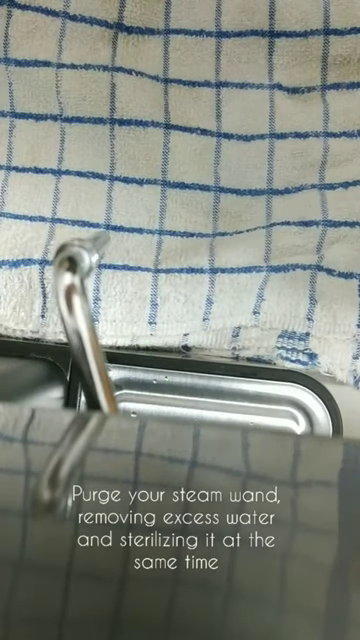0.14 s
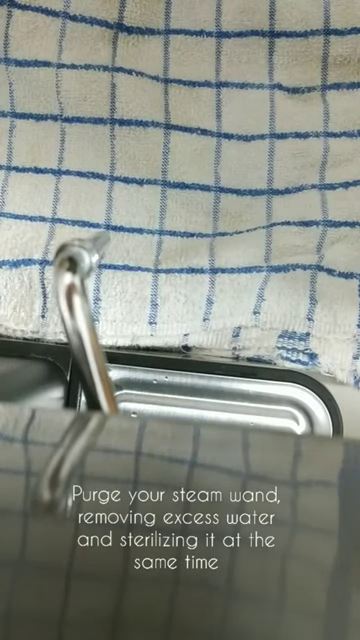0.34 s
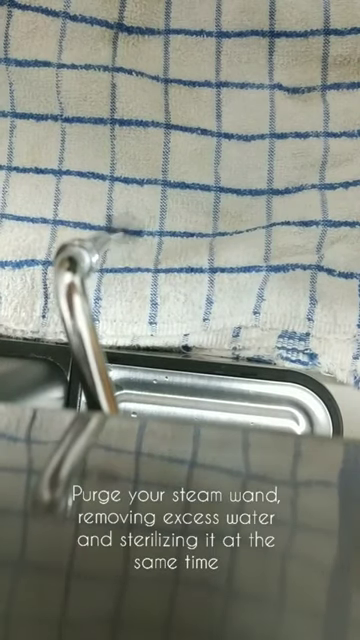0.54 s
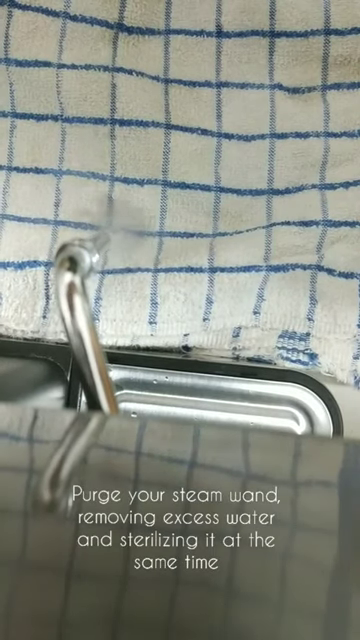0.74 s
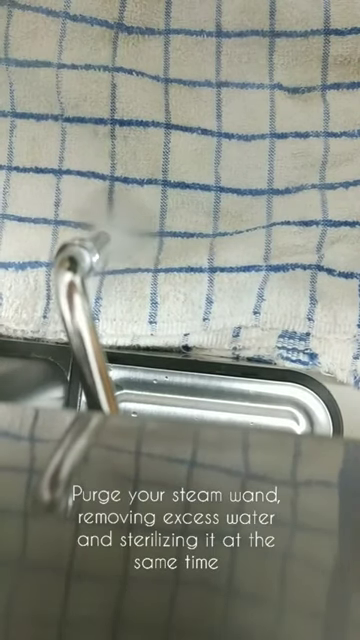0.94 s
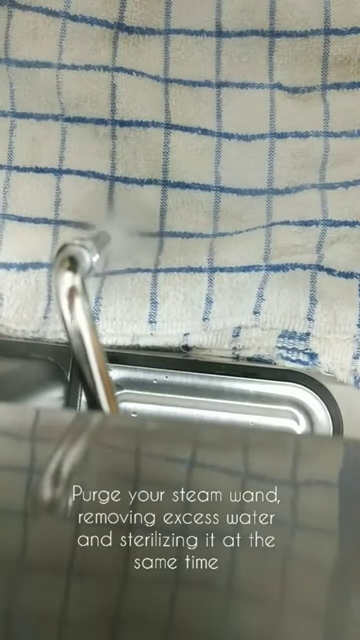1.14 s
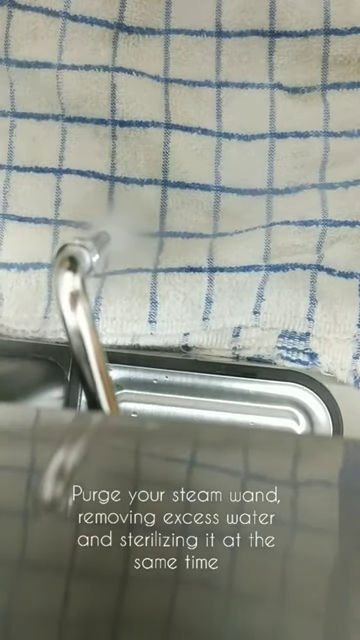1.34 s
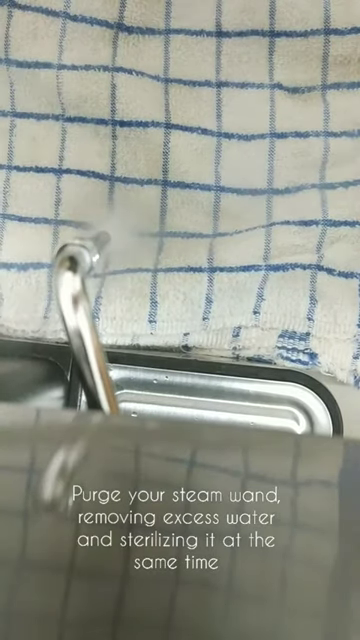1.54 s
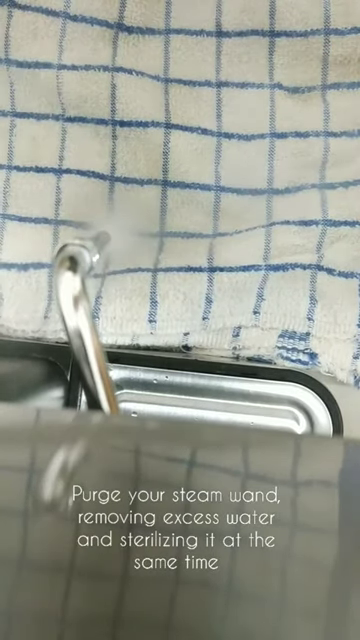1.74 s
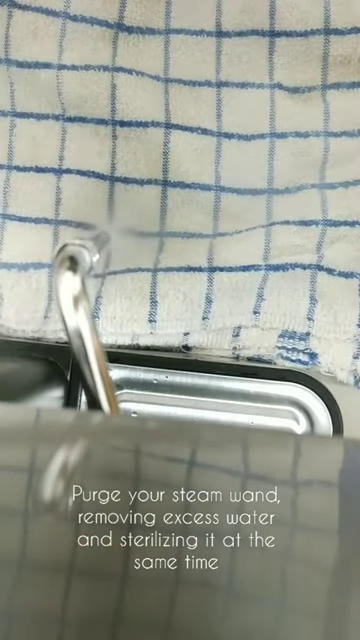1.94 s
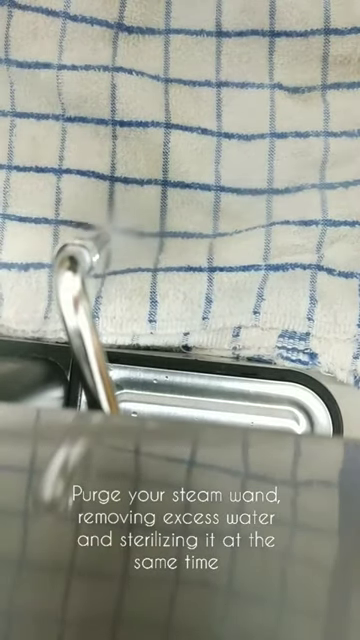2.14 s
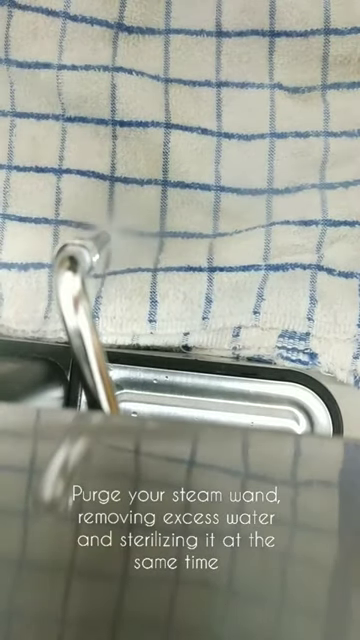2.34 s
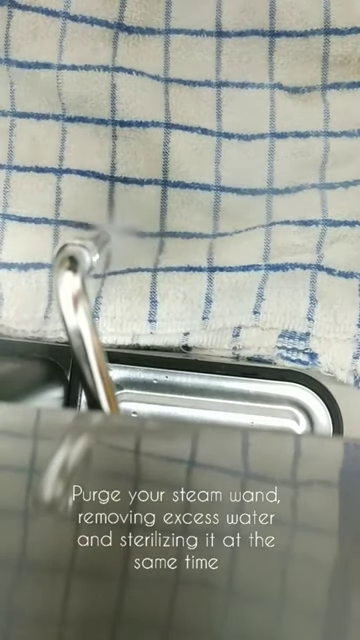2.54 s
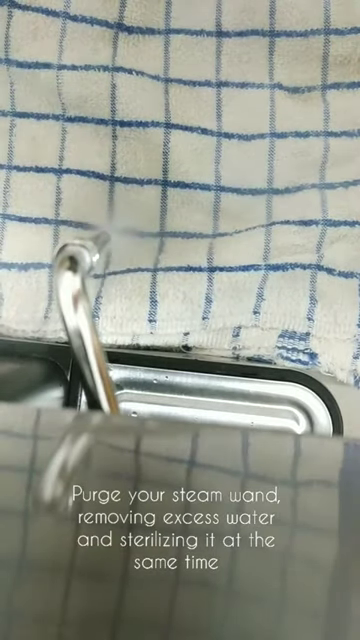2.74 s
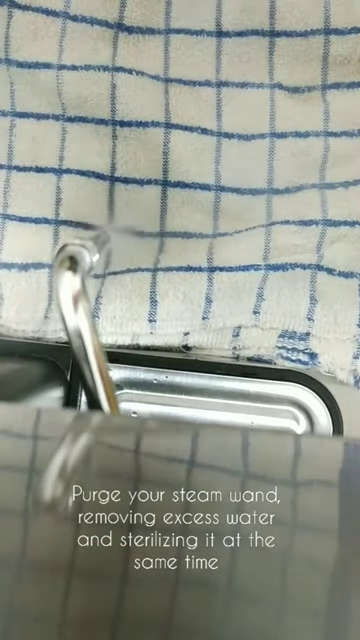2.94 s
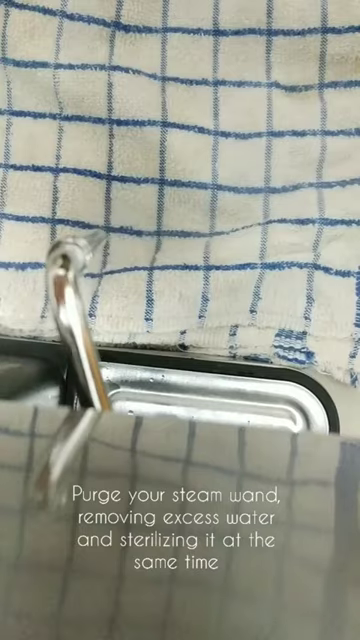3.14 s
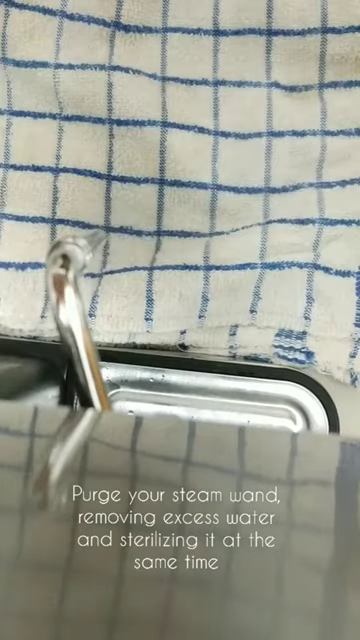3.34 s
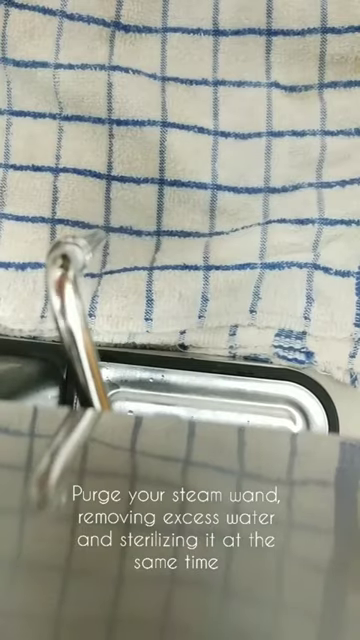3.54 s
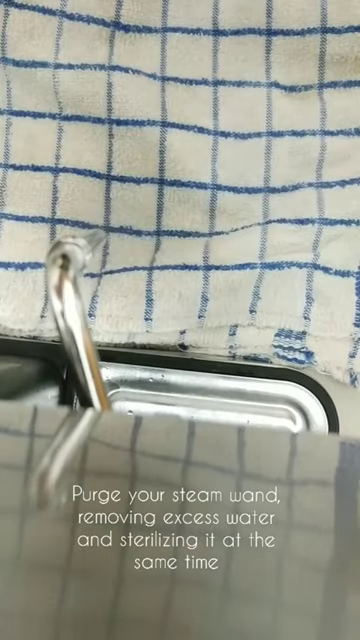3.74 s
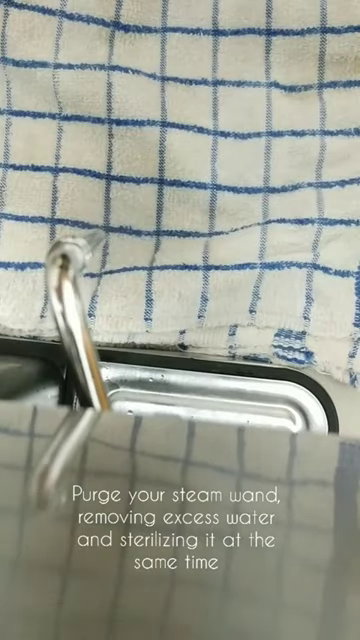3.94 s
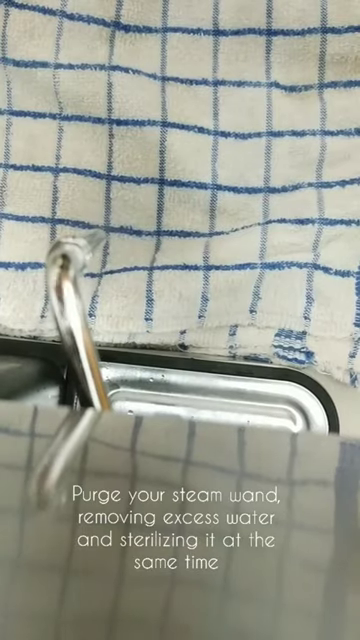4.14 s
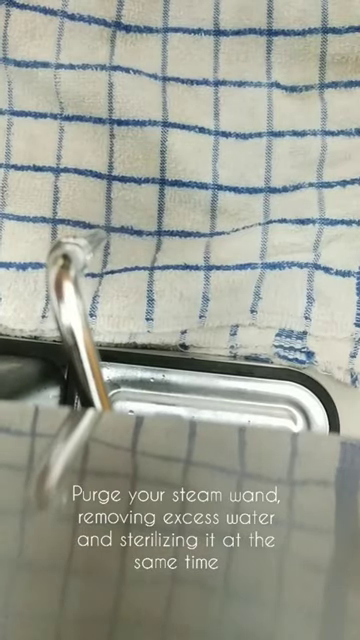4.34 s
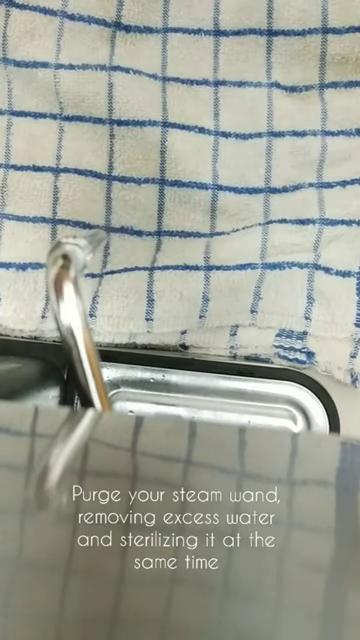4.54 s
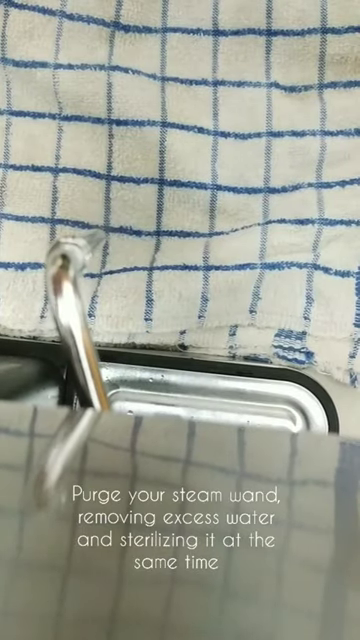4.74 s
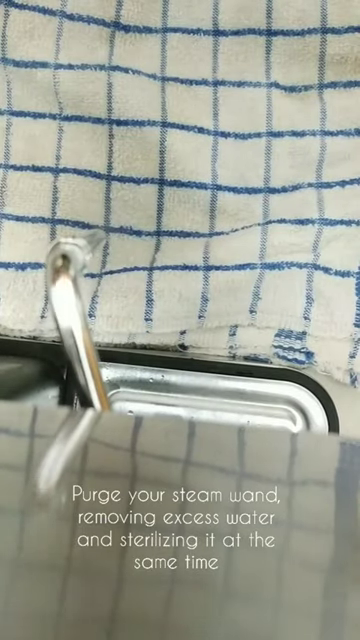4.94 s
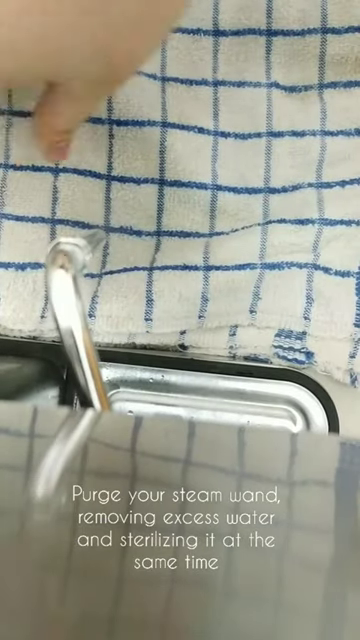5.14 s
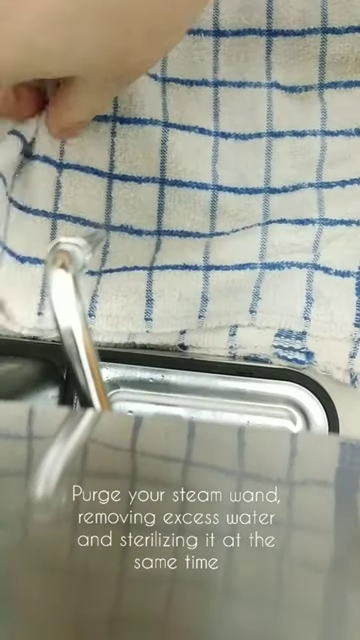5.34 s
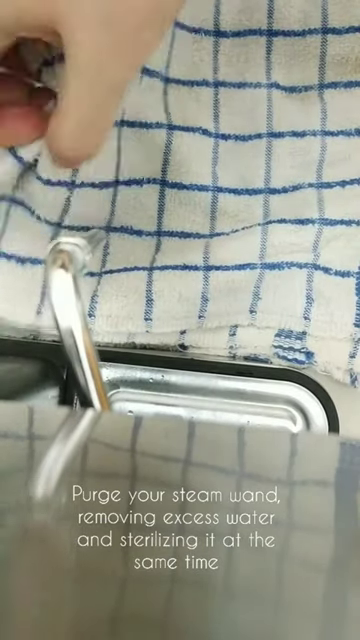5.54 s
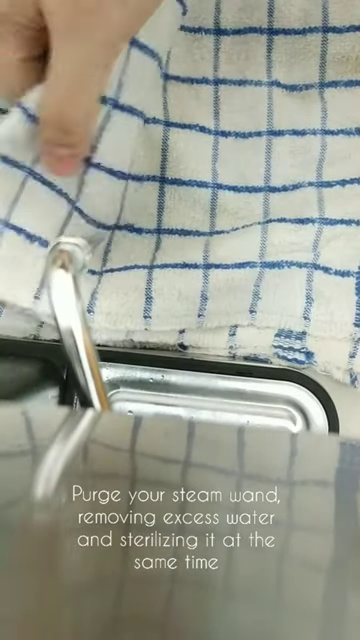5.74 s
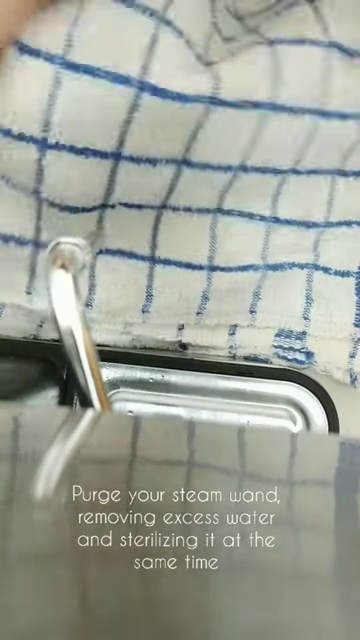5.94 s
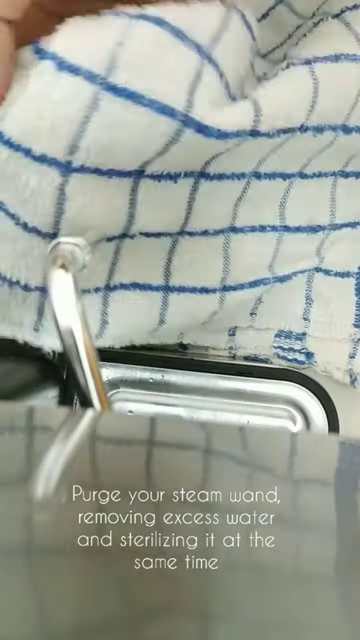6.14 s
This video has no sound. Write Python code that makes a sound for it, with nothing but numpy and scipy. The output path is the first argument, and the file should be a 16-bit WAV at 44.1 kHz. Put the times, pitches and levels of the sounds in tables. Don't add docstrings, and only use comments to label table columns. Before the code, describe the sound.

A steam wand pops and spits water slugs, bursts into a loud dry hiss, shuts off, then knocks and cloth rustles in a quiet kitchen.

```python
import sys
import numpy as np
from scipy import signal
from scipy.fft import rfft, irfft, next_fast_len
from scipy.io import wavfile
from scipy.ndimage import uniform_filter1d

SR = 44100
rng = np.random.default_rng(int(sys.argv[2]) if len(sys.argv) > 2 else 0)


def to_linear_factor(level_db):
    exponent = np.asarray(level_db, float) / 20
    return 10 ** exponent


def unload_wav(signal):
    wavfile.write(
        sys.argv[1],
        SR,
        np.round(np.clip(np.atleast_2d(signal).T, -1, 1) * 32767).astype(np.int16),
    )


N = 272966
T = np.arange(N) / SR
SIDES = np.array([[.5], [-.5]])

# frequency [Hz], density [dB per Hz].
ROOM_COLOUR = [(30, -20), (70, -22), (110, -9.5), (214, -3), (459, -13), (496, -8), (955, -12),
               (1270, -12.5), (1490, -15.5), (2870, -16.5), (4300, -19.5), (6300, -26.5), (11000, -27.5),
               (15800, -33)]
# frequency [Hz], correlation [-1 to 1].
ROOM_ALIKE = [(60, .95), (130, 0.81), (290, 0.42), (640, 0.26), (900, 0), (1410, 0), (3100, 0),
              (6820, 0.06), (15000, .4)]
ROOM_BANDS_DB = [-52.5, -54.5, -60.5]
# start [s], length [s], middle over room [dB], rustle over room [dB].
HANDLING = [
    (4.07, 0.25, 5, 4),
    (4.486, 0.33, 2.5, -1),
    (4.838, 0.29, 3.5, 1.7),
    (5.257, .05, -1, 4),
    (5.55, .05, -1.5, 5.5),
    (5.694, 0.049, 0, 0.5),
    (5.94, .03, -2, 3.5),
]
# start [s], length [s], level [dB], centre [Hz], width [Hz].
SIZZLES = [
    (0.013, .006, -56, 8200, 2200),
    (4.06, 0.233, -56.5, 4700, 4300),
    (4.35, .15, -60, 3600, 2500),
    (4.13, 0.033, -60, 11000, 6000),
    (4.4, .01, -55.5, 2200, 1000),
    (4.2, 0.25, -57, 780, 140),
    (5.03, 0.14, -60, 840, 400),
    (5.55, 0.13, -62, 1050, 350),
    (3.56, 0.16, -56.5, 2650, 600),
]
# frequency [Hz], density [dB per Hz].
JET_COLOUR = [(41, -54), (70, -55), (118, -14), (222, -13), (439, -11.5), (481, -13.5), (908, -15.5),
              (1060, -15.5), (1530, -18.5), (2950, -18.5), (5960, -13.5), (12000, -7.5), (14800, -3),
              (15800, -3.5)]
# frequency [Hz], correlation [-1 to 1].
JET_ALIKE = [(60, .3), (130, .45), (350, .33), (700, .0), (1410, .26), (3100, .18), (6000, .04), (10500, 0),
             (12000, 0.7), (15000, 0.74)]
# frequency [Hz], left minus right [dB].
JET_PAN = [(60, -4), (110, 7.5), (200, 7.5), (380, 0), (700, 2), (1290, 7.5), (2380, -4.5), (4400, -1),
           (8120, -2), (15000, -1)]
# time [s], steam flow as hiss level [dB], left minus right [dB].
FLOW = [(.05, -68, -2), (.2, -64, -14), (.215, -51, -25), (.45, -37, -8.5), (.853, -35, -8), (.862, -22, 3),
        (.99, -19.5, 2.5), (1.2, -17, -0.5), (1.8, -16, -3.5), (2.4, -18, -3.5), (3.066, -15.5, -2.5),
        (3.072, -21.5, 4.5), (3.17, -27, 5), (3.22, -28.5, -0.5), (3.37, -35.5, -11.5), (3.63, -45.5, -18),
        (3.9, -50.5, -17), (4.0, -60.5, -17)]
# clearing time [s], choke length [s], choke [dB], surge [dB].
CHOKES = [(.34, 0.094, -9, -5), (.43, 0.028, 7, 3), (.742, .03, 5, -5), (.8, 0.06, -4, -1),
          (.55, 0.063, -2, -1), (1.175, 0.045, -1.5, 0), (1.817, 0.1, -4, 0.5), (1.875, 0.032, 0, 0),
          (1.972, 0.034, -2, 0.5), (2.06, 0.04, 0.5, 1.5), (2.088, 0.027, -3, 0), (2.208, 0.12, -3, 1.5),
          (2.15, 0.042, -1.5, -1), (1.72, 0.041, -1, 0.5), (2.265, .04, 0.5, 0.5), (2.455, .04, 1.5, 0),
          (2.592, 0.18, -3, 1), (2.645, 0.03, 0, 3), (1.44, 0.037, 1.5, -1), (2.776, 0.027, -1, 1.5),
          (2.88, 0.15, -3, -1), (2.98, 0.12, -4, 0), (3.031, 0.022, -4, 1.5)]
# centre [Hz], width [Hz], level over the hiss [dB].
LEAK = [(6530, 420, -5), (2770, 410, -16.5)]
# time [s], pop [dB], pipe ring [dB], thump [dB].
POPS = [(0.1031, -7.5, -17.5, -30.5), (0.185, -37, -28, -45), (0.195, -20.5, -24, -36), (.2, -26, -35, -34),
        (.211, -29, -25, -34), (0.2284, -6, -24, -18.5), (.234, -31, -32, -28), (0.258, -27, -37, -29),
        (.28, -39, -40, -41), (.303, -50, -23, -45), (.309, -51, -19, -47), (.317, -48, -16, -42),
        (.323, -42, -20, -42), (0.3416, -12.5, -16, -33), (0.345, -10.5, -22, -20), (0.35, -27, -17, -21),
        (.361, -21, -20, -22), (.377, -28, -35, -43), (0.384, -6, -29, -17), (0.401, -6.5, -14, -22),
        (0.415, -11, -13, -20), (0.4173, -7, -24, -36), (0.5028, -25, -22, -49), (0.5247, -37, -25, -30),
        (0.5526, -16, -18, -23), (0.5571, -6, -18, -16.5), (0.568, -13, -34, -30), (0.5767, -7, -27, -32),
        (0.5873, -6, -35, -25), (0.5924, -5.5, -19, -41), (0.6036, -10, -36, -33),
        (0.6905, -14.5, -10.5, -43), (.695, -27, -16, -45), (.701, -30.5, -27, -45),
        (0.7363, -12, -22, -45), (0.7418, -7, -23, -25), (0.7507, -20, -37, -36), (0.7582, -8.5, -50, -22),
        (0.7755, -5.5, -39, -24), (0.7902, -5, -17, -28), (0.7965, -25, -34, -26), (0.8097, -6, -25, -40),
        (0.821, -24, -35, -42), (.845, -31, -43, -44), (0.94, -28, -38, -22.5), (0.976, -31, -37, -29),
        (1.007, -36, -21, -29)]
# start [s], length [s], level at the tip [dB], pipe minus tip [dB].
CHURNS = [(0.109, .008, -43, 7), (0.127, 0.038, -46.5, -4), (0.187, 0.012, -32, 4.5),
          (0.214, 0.008, -36, 3), (0.229, 0.0067, -30, 2), (0.255, 0.1, -42, 2.5), (0.325, 0.006, -57, 16),
          (0.354, 0.014, -30, -12), (0.375, .006, -33, -8), (0.399, 0.024, -23.5, -20),
          (0.443, 0.029, -37, -2), (0.483, 0.077, -40, 8.5), (0.565, 0.04, -29, -5),
          (0.617, 0.063, -31, -4), (0.693, 0.008, -30.5, 4), (0.722, 0.026, -30, 3.5),
          (0.753, .004, -34, -8), (0.796, 0.006, -26.5, -12), (0.817, 0.044, -30, -8),
          (0.88, 0.031, -36, -3), (0.929, 0.057, -37, -6), (0.997, 0.024, -42, -2), (1.098, 0.075, -45, 5)]
# start [s], length [s], level [dB], centre [Hz], width [Hz].
SPITS = [(.184, 0.0015, -43, 9200, 10000), (.194, 0.0034, -45, 7000, 8000), (.21, 0.02, -38, 10900, 9000),
         (.262, .01, -36, 11400, 4000), (0.442, 0.028, -35, 9900, 3000), (0.485, 0.025, -28, 13500, 3500),
         (.63, .03, -36, 13000, 5000), (0.696, .02, -35, 13500, 5000), (.725, .012, -35, 9050, 6000),
         (.739, 0.0038, -20.5, 10600, 3000), (0.81, 0.039, -35, 14800, 2000),
         (.845, 0.009, -29, 13900, 3000), (.858, 0.006, -23, 8800, 5000), (.868, .025, -26, 10500, 3000)]
# time [s], level [dB], frequency [Hz].
TICKS = [(2.775, -23, 1730), (3.299, -21.5, 2760), (3.33, -21.5, 510), (3.707, -29, 550), (4.159, -32, 875),
         (4.387, -31.5, 780), (4.459, -34.5, 2460), (5.009, -46, 604), (5.099, -45, 719), (5.569, -33, 689),
         (5.949, -39.5, 400)]
# start [s], length [s], level [dB].
HUMS = [
    (3.17, 0.069, -50),
    (3.32, 0.37, -50),
    (3.94, 0.027, -45),
    (4.136, 0.053, -49),
    (4.354, 0.1, -49.5),
]
# time [s], body [dB], crack [dB], left minus right [dB].
KNOCKS = [(4.7503, -24, -38, -3), (4.754, -21, -62, 0), (4.7628, -24, -22.5, -9.5), (4.784, -29, -33, -0.5),
          (4.788, -35, -29, -3), (4.8042, -25, -52, -10), (4.8073, -9.5, -18, -8), (4.813, -19.5, -35, -8),
          (4.818, -21, -38, -4), (4.828, -23, -49, 7), (4.851, -31, -39, 1)]
# frequency [Hz], level [dB], t60 [s].
COUNTER_MODES = [(237, -7, 0.12), (322, -2, 0.046), (547, 4, 0.05), (680, -1.5, 0.044), (925, 1.5, 0.037),
                 (1080, 0, 0.037), (1464, -3, 0.033), (1320, -5, .03), (2405, -1, 0.014),
                 (2920, 1.5, 0.021), (4230, -9, 0.012), (6280, -10, .016), (7200, -12, 0.015)]
# time [s], turning rate [Hz], level [dB].
FAN = [
    (0, 94, -75),
    (4.55, 94.5, -73),
    (5.3, 99, -55.5),
    (5.86, 102, -51),
    (6.19, 104.5, -52.5),
]
# multiple of the turning rate, level [dB].
FAN_ORDERS = [(1, -2.5), (1.5, -4), (2, -8)]


def curves(table):
    s, *columns = np.transpose(table)
    return [np.interp(T, s, c) for c in columns]


def at(points, hz):
    f, v = np.transpose(points)
    return np.interp(np.log(hz), np.log(f), v)


def to_db(gain):
    return 20 * np.log10(gain + 1e-6)


def level(x):
    return x / x.std()


def smooth(x, size):
    return uniform_filter1d(uniform_filter1d(x, size), size)


def walk(rate):
    hold = int(SR / rate)
    steps = np.repeat(rng.standard_normal(N // hold + 1), hold)
    return 1.08 * smooth(steps, hold)[:N]


def bout(s, length_s, rise_s, fall_s):
    return np.exp(np.minimum(T - s, 0) / rise_s - np.maximum(T - s - length_s, 0) / fall_s)


def resonance(x, hz, width_hz):
    return signal.lfilter(*signal.iirpeak(hz, hz / width_hz, fs=SR), x)


def grain(hz, rise_s, fall_s, phase):
    t = np.arange(2048) / SR
    shape = (1 - np.exp(-t / rise_s)) ** 2 * np.exp(-t / fall_s)
    return np.sin(2 * np.pi * hz * t + phase) * shape / shape.max()


def add(out, s, sound):
    i = int(s * SR)
    out[:, i:i + sound.shape[1]] += sound


def bands(source, colour, alike, lag_from_hz):
    lag_s, lag_top_hz = .00052, 9500
    size = next_fast_len(N)
    f = np.maximum(np.arange(size // 2 + 1) * SR / size, 1)
    ripple_db = 1.5 * level(smooth(rng.standard_normal(len(f)), 900))
    gain = to_linear_factor(at(colour, f) + ripple_db * np.clip(f / 6000, 0, 1)) * (f < colour[-1][0])
    mid, side = rfft(source, size) * gain
    c = np.clip(at(alike, f), -.95, .95)
    pair = np.array([1, -1])[:, None] * side * np.sqrt((1 - c) / 2) + mid * np.sqrt((1 + c) / 2)
    pair[0] *= np.exp(-2j * np.pi * f * lag_s * (f > lag_from_hz) * (f < lag_top_hz))
    for hz in 32 * 2 ** np.arange(0, 9.6, .5):
        mask = np.cos(np.pi * np.clip(np.log2(f / hz), -.5, .5)) ** 2
        part = irfft(pair * mask, size)[:, :N]
        yield hz, part, np.mean(part ** 2)


def shaped(slices, anchors_hz, edges_hz, levels_db, flicker_db, rate):
    slices = list(slices)
    base_db = [10 * np.log10(sum(p for hz, _, p in slices if lo <= hz < hi)) for lo, hi in edges_hz]
    out, last = 0, walk(rate)
    for hz, part, _ in slices:
        weights = [np.interp(np.log(hz), np.log(anchors_hz), w) for w in np.eye(len(base_db))]
        own = walk(rate)
        db = sum(w * (lv - b) for w, lv, b in zip(weights, levels_db, base_db))
        out = out + part * to_linear_factor(db + flicker_db * (own + last))
        last = own
    return out


def handling():
    middle, top = sum(np.outer([middle_db, top_db], bout(s, length_s, rise_s=0.086, fall_s=0.056))
                      for s, length_s, middle_db, top_db in HANDLING)
    low_db, middle_db, top_db = ROOM_BANDS_DB
    return [low_db + 0.67 * middle, middle_db + middle, top_db + top]


def room():
    slices = bands(rng.standard_normal((2, N)), ROOM_COLOUR, ROOM_ALIKE, lag_from_hz=900)
    early_db = np.interp(T, [0, .2, 3.5], [1.5, 1.2, 0])
    edges_hz = [(100, 450), (450, 2000), (4000, 17000)]
    return to_linear_factor(1.0 + early_db) * shaped(slices, [220, 950, 7000], edges_hz, handling(), flicker_db=0.9, rate=13)


def hisses(table, rise_s, fall_s, pan_db):
    out, lumps = np.zeros((2, N)), to_linear_factor(3.5 * walk(300))
    for s, length_s, db, hz, width_hz in table:
        span = slice(max(int((s - .1) * SR), 0), int((s + .4) * SR))
        noise = rng.standard_normal((2, N // 12))
        hiss = level(resonance(resonance(noise, hz, width_hz), hz, width_hz))
        shape = (lumps * bout(s, length_s, rise_s, fall_s))[span]
        out[:, span] += hiss[:, :len(shape)] * shape * to_linear_factor(db + pan_db * SIDES)
    return out


def chokes():
    clear_s, surge_s = 0.024, 0.034
    return sum(np.interp(T, [s - length_s, s - clear_s, s, s + surge_s], [0, choke_db, surge_db, 0])
               for s, length_s, choke_db, surge_db in CHOKES)


def churn():
    tip, pipe = 0, 0
    for s, length_s, db, pipe_db in CHURNS:
        gain = bout(s, length_s, rise_s=.003, fall_s=.009) * to_linear_factor(db)
        tip = tip + gain
        pipe = pipe + gain * to_linear_factor(pipe_db)
    return to_db(tip), to_db(pipe)


def leak(noise, hiss_db):
    closing_db = np.interp(T, [3.05, 3.3, 3.6], [-25, -4, 1.5])
    out = 0
    for hz, width_hz, db in LEAK:
        whistle = level(resonance(resonance(noise, hz, width_hz), hz, 1.5 * width_hz))
        out = out + whistle * to_linear_factor(db + hiss_db + closing_db)
    return out


def jet():
    noise = rng.standard_normal((2, 2, N))
    flow_db, pan_db = curves(FLOW)
    open_db = flow_db + 18
    stutter_db, dryness = chokes(), np.interp(T, [.85, .93], [0, 1])
    wetness = 1 - dryness
    hiss_db = flow_db + stutter_db
    pan_db = pan_db + 0.31 * np.maximum(stutter_db, 0) * wetness
    snap_db = -3.5 * bout(3.068, 0.025, rise_s=0.0028, fall_s=0.17)
    rush_stutter_db = 2.04 * (stutter_db * dryness + np.minimum(stutter_db, 0) * wetness)
    rush_db = -26.5 + 0.88 * open_db + rush_stutter_db + snap_db + 5 * wetness
    roar_db = -36 + 0.62 * open_db + 1.95 * stutter_db * dryness + snap_db
    splash_db = churn()[0]
    levels_db = [to_db(to_linear_factor(roar_db) + to_linear_factor(splash_db - 7.0)),
                 to_db(to_linear_factor(rush_db) + to_linear_factor(splash_db - 18)),
                 to_db(to_linear_factor(hiss_db) + to_linear_factor(splash_db - 21))]
    slices = ((hz, part * to_linear_factor(at(JET_PAN, hz) * SIDES), power)
              for hz, part, power in bands(noise[0], JET_COLOUR, JET_ALIKE, lag_from_hz=1))
    edges_hz = [(200, 1800), (2500, 7000), (9000, 17000)]
    broad = shaped(slices, [700, 4200, 12000], edges_hz, levels_db, flicker_db=0.61, rate=16)
    droplets = to_linear_factor(1.28 * walk(250) + 0.1 * walk(39.0))
    shut_db = np.interp(T, [.06, .09, 3.9, 4.1], [-37.0, -0.5, -3.0, -9.0])
    return to_linear_factor(shut_db + 1.0 + (pan_db + 2.0) * SIDES) * droplets * (broad + leak(noise[1], hiss_db))


def pops():
    out, t = np.zeros((2, N)), np.arange(2048) / SR
    for s, db, pipe_db, thump_db in POPS:
        r = rng.random(5)
        phase = 2 * np.pi * r
        cavity = grain(1340 + 90 * (r[4] - .5), 0.0007, 0.0014, phase[0])
        cavity += 0.11 * grain(2146, 0.00055, 0.0024, 0)
        cavity += 0.13 * grain(990, 0.00029, 0.0057, phase[1])
        near = to_linear_factor(db + 4.5) * cavity
        pipe = to_linear_factor(pipe_db) * grain(570 + 50 * (r[1] - .5), 0.00088, 0.0052, phase[2])
        thump = to_linear_factor(thump_db) * grain(260 + 80 * (r[3] - .5), 0.0033, 0.0033, phase[2])
        noise = rng.standard_normal((3, 2048))
        spray = to_linear_factor(-13.5 + 0.46 * db) * resonance(noise[:2], 5900, 4400) * np.exp(-t / 0.0024)
        splat = to_linear_factor(-1 + .7 * db) * resonance(noise[2], 830, 760)
        splat = splat * (1 - np.exp(-t / 0.00063)) * np.exp(-t / 0.0065)
        left = near + pipe + 1.48 * thump
        right = splat + 0.16 * np.roll(near, 18) + 0.43 * np.roll(pipe, 14) + 0.33 * np.roll(thump, 12)
        add(out, s + .0004, spray + np.array([left, right]))
    return out


def gurgle():
    tip_db, pipe_db = churn()
    # (level dB, Hz, width Hz, left minus right dB, shared part)
    modes = [(pipe_db, 604, 81, 12.5, 0.67), (tip_db - 0.5, 280, 160, 7.5, 0.54), (tip_db, 1230, 470, 14.0, 0.15),
             (tip_db - 2.0, 1150, 1000, -15.0, 0.1)]
    out = 0
    for db, hz, width_hz, pan_db, share in modes:
        common, *own = rng.standard_normal((3, N))
        noise = share * common + (1 - share) * np.array(own)
        ring = resonance(resonance(noise, hz, width_hz), hz, 3.9 * width_hz)
        out = out + level(ring) * to_linear_factor(db - 5.0 + 2.7 * walk(110.1) + pan_db * SIDES)
    return out


def ticks():
    out, t = np.zeros((2, N)), np.arange(3000) / SR
    for s, db, hz in TICKS:
        width_hz = .08 * hz + 0.00011 * hz ** 2
        puff = level(resonance(rng.standard_normal((2, len(t))), hz, width_hz))
        add(out, s, to_linear_factor(db - 9.0) * puff * (1 - np.exp(-t / 0.0015)) * np.exp(-t / 0.015))
    return out


def hum_level():
    swells = sum(to_linear_factor(db) * bout(s, length_s, rise_s=0.054, fall_s=0.044) for s, length_s, db in HUMS)
    return to_db(to_linear_factor(-59.5) + swells)


def hum():
    from_s, start_hz, climb_hz_per_s = 3.4, 167, 8.15
    hz = start_hz + climb_hz_per_s * np.maximum(T - from_s, 0)
    phase = 2 * np.pi * np.cumsum(hz * (1 + 0.0223 * walk(14))) / SR
    gate_db = np.interp(T, [3.0, 3.1, 4.52, 4.6], [-45, -2.5, 0.0, -26])
    return np.sin(phase) * to_linear_factor(hum_level() + 2.0 + gate_db + 2.1 * walk(24.0) + 0.99 * SIDES)


def knocks():
    out, t = np.zeros((2, N)), np.arange(6000) / SR
    tilt = 0.24
    for s, db, crack_db, pan_db in KNOCKS:
        hardness_db = crack_db - db
        body = 0
        for hz, mode_db, t60_s in COUNTER_MODES:
            detune, phase = rng.uniform(-1, 1, (2, 2, 1))
            gain = to_linear_factor(mode_db + tilt * (hardness_db + 12.0) * np.log2(hz / 500))
            ring = np.sin(2 * np.pi * hz * (1 + 0.031 * detune) * t + 1.7 * phase)
            body = body + gain * ring * np.exp(-np.log(1000) * t / t60_s)
        noise = rng.standard_normal((2, 2, len(t)))
        thud = resonance(resonance(noise[0], 1040, 1400), 900, 2500) * np.exp(-t / 0.0086)
        body = body + 2.0 * to_linear_factor(tilt * (hardness_db + 6.0)) * thud
        body = body * (1 - np.exp(-t / 0.00055)) ** 2
        crack = resonance(noise[1], 3900, 4600) + 0.13 * resonance(noise[1], 15000, 7500)
        crack = crack * (1 - np.exp(-t / 0.0022)) * (np.exp(-t / 0.0021) + 0.097 * np.exp(-t / 0.017))
        knock = to_linear_factor(db + 1.0) * body / np.abs(body).max() + to_linear_factor(crack_db + 7.5) * crack
        add(out, s, knock * to_linear_factor(pan_db * SIDES))
    return out


def fan():
    turn_hz, fan_db = curves(FAN)
    turn = 2 * np.pi * np.cumsum(turn_hz) / SR
    return sum(to_linear_factor(fan_db + db + 1.6 * walk(7.2)) * np.sin(k * turn) for k, db in FAN_ORDERS)


def scene():
    sizzles = hisses(SIZZLES, rise_s=.012, fall_s=.03, pan_db=-12.5)
    spits = hisses(SPITS, rise_s=.002, fall_s=.005, pan_db=-12)
    return room() + sizzles + jet() + pops() + gurgle() + spits + ticks() + hum() + knocks() + fan()


def patchy(x, patchy_db, hole_share, hole_db):
    f, _, z = signal.stft(x, SR, nperseg=1024, noverlap=768)
    waver, holes = rng.standard_normal((2,) + z.shape[1:])
    waver = level(uniform_filter1d(smooth(waver, 10), size=2, axis=0))
    strips = np.arange(len(f)) // 4 * 4
    holes = level(uniform_filter1d(uniform_filter1d(holes, size=9), size=3)[strips])
    holes = holes - np.interp(f, [2300, 2700, 5000, 7500, 10000], [3, .1, .1, .3, .8])[:, None]
    loud = np.log(uniform_filter1d(np.abs(z).mean(axis=(0, 1)), size=20))
    holes = holes + .3 * level(loud)
    gone = uniform_filter1d(1. * (holes > np.quantile(holes, 1 - hole_share)), size=3)
    db = patchy_db * waver * np.clip(f[:, None] / 2500, 0, 1) + hole_db * gone
    return signal.istft(z * to_linear_factor(db), SR, nperseg=1024, noverlap=768)[1][:, :N]


def top_cut(x):
    return signal.sosfilt(signal.butter(12, 17030, fs=SR, output="sos"), x)


def record(dry):
    x = signal.sosfilt(signal.butter(2, 115, "high", fs=SR, output="sos"), dry)
    x = np.tanh(1.1 * x) / 1.1
    x = patchy(x, patchy_db=2.9, hole_share=.064, hole_db=-45)
    x = signal.sosfiltfilt(signal.ellip(12, .1, 80, 15750, fs=SR, output="sos"), x)
    return top_cut(x)


dry = scene()
out = record(dry)
unload_wav(out)
```